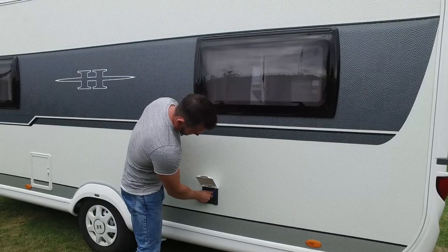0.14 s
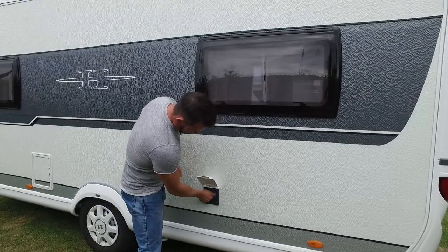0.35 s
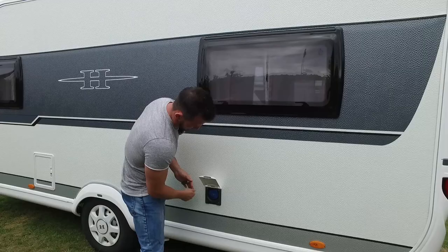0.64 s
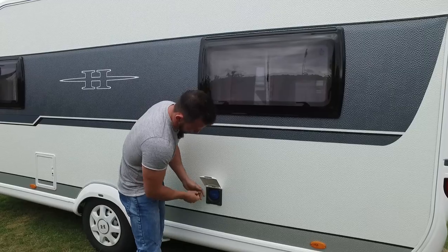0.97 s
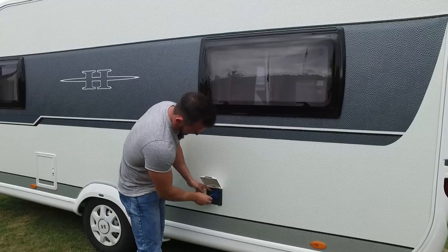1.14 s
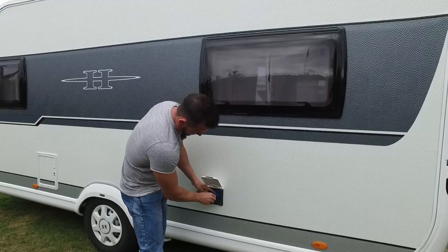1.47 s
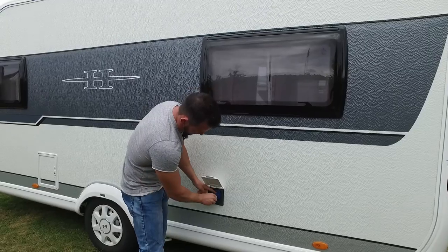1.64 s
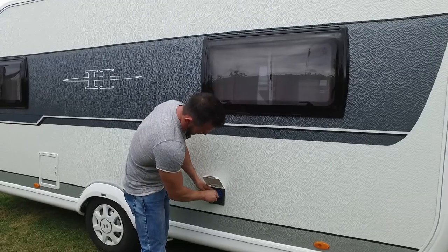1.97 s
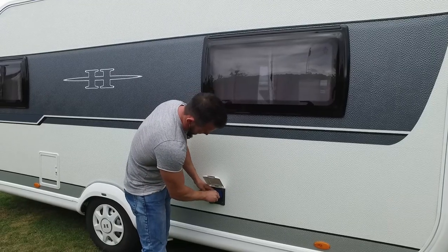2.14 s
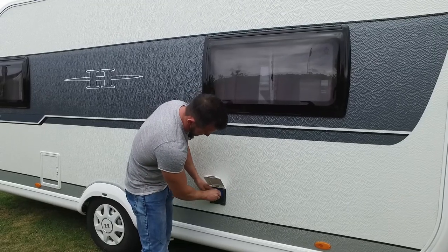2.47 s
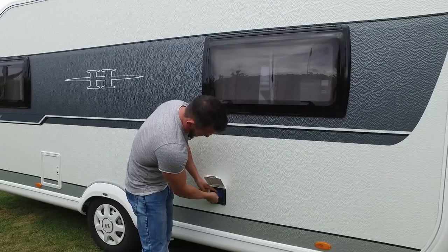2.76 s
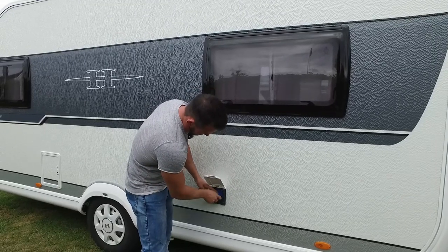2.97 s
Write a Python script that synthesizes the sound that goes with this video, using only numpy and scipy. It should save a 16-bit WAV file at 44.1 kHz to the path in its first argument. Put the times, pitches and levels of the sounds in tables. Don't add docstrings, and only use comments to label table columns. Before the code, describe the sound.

Plastic and key fumbling on a hollow caravan wall, close and outdoors. From 0.05 to 0.4 s, clicks, scrapes and a brief key rattle near 0.25 s, then a strong thudding knock at 0.63 s. Quieter until clacks at 1.4 and 1.6 s. From 2.1 to 2.85 s, cap knocks, scrapes and thuds, strongest around 2.55. Faint wind, distant traffic, a barely audible far hoot at 3 s.

```python
import sys
import numpy as np
from scipy import signal
from scipy.io import wavfile

SR = 44100
rng = np.random.default_rng(int(sys.argv[2]) if len(sys.argv) > 2 else 0)


def transcribe(signal):
    frames = np.atleast_2d(signal).T
    limited = np.clip(frames, -1, 1)
    pcm = np.round(limited * 32767).astype(np.int16)
    wavfile.write(sys.argv[1], SR, pcm)


def rack_gain(trim_db):
    fader = np.asarray(trim_db, float)
    return 10 ** (fader / 20)


N = 136710


def rms_one(x):
    return x / np.sqrt(np.mean(x ** 2) + 1e-20)


def at_hz(points, hz, column=1):
    points = np.array(points)
    return np.interp(np.log(hz), np.log(points[:, 0]), points[:, column])


def drift(rate_hz):
    r = np.exp(-80 * np.pi * rate_hz / SR)
    white = rng.standard_normal(N // 40 + 2002)
    slow = signal.lfilter([1], [1, -2 * r, r * r], white)[2000:]
    return np.interp(np.arange(N) / 40, np.arange(len(slow)), rms_one(slow))


def ring(clicks, hz, t60):
    r, w = rack_gain(-60 / (t60 * SR)), 2 * np.pi * hz / SR
    return signal.lfilter([0, np.sin(w)], [1, -2 * r * np.cos(w), r * r], clicks + 1e-18)


def band_pass(x, low_hz, high_hz):
    return signal.sosfilt(signal.butter(2, [low_hz, high_hz], "band", fs=SR, output="sos"), x)


def bands(low_hz):
    edges = low_hz * 2 ** np.arange(0, 9, .5)
    edges = edges[edges < 20000]
    return [(np.sqrt(a * b), signal.butter(2, [a, b], "band", fs=SR, output="sos"))
            for a, b in zip(edges, edges[1:])]


def coloured(x, spectrum, low_hz):
    return sum(rack_gain(at_hz(spectrum, hz)) * signal.sosfilt(sos, x + 1e-18) for hz, sos in bands(low_hz))


def add(out, s, x):
    i = max(int(s * SR), 0)
    out[i:i + len(x)] += x[:N - i]


def thuds():
    # t/s, peak level/dB, f/Hz
    pushes = [(0.196, -35, 163), (0.211, -29.5, 199), (0.25, -31.5, 197), (0.298, -29, 153),
              (0.315, -32.5, 157), (0.342, -20.5, 265), (0.548, -22, 290), (0.5925, -28, 220),
              (0.6295, -8.5, 326), (1.376, -24.5, 345), (1.4415, -32.5, 232), (1.559, -35, 295),
              (1.6125, -19, 260), (1.872, -33, 248), (2.083, -25, 231), (2.0995, -24, 237),
              (2.119, -28.5, 187), (2.212, -42.5, 247), (2.3351, -19.5, 244), (2.3455, -27, 374),
                  (2.365, -27.5, 293), (2.413, -25, 201), (2.4343, -26, 220), (2.533, -14, 194),
                  (2.559, -25, 240), (2.5843, -15.5, 227), (2.713, -37.5, 280), (2.746, -33.5, 202),
                  (2.77, -30.5, 235), (2.7923, -27, 226), (2.809, -27.5, 290), (2.83, -28.5, 400),
                  (3.06, -39.5, 206)]
    # f/Hz, level/dB, t60/s
    wall_modes = [(141, -70.5, 0.17), (237, -10, 0.28), (277.6, -9, 0.17), (366.2, 2, 0.076),
                  (455.7, -5, 0.084), (541.4, 0.5, 0.089)]
    push_cycles, push_db, panel_db, lag_s = 0.41, 1, -16.5, .004
    rows = pushes
    t = np.arange(SR // 4) / SR
    kick = np.arange(SR // 4) == 0
    luck_db = rng.normal(0, 2.12, (len(rows), len(wall_modes)))
    out = np.zeros(N)
    for (s, db, hz), lucks in zip(rows, luck_db):
        u = t * hz / push_cycles
        push = -u * np.exp(1 - u) * np.sin(2 * np.pi * hz * t)
        panel = sum(rack_gain(mode_db + luck) * ring(kick, f, t60)
                    for (f, mode_db, t60), luck in zip(wall_modes, lucks))
        panel = panel * (1 - np.exp(-u * .5))
        add(out, s + lag_s, rack_gain(db + push_db) * (push - rack_gain(panel_db) * panel))
    return out


def bursts(lengths, spectrum, low_hz, rough):
    t = np.arange(rough.shape[1]) / SR
    shape = np.exp(-t / np.reshape(lengths, (-1, 1))) * (1 - np.exp(-t / .0003))
    x = coloured(rough * shape, spectrum, low_hz)
    return x / np.abs(x).max(axis=1, keepdims=True)


def contacts():
    # t/s, peak level/dB, treble level over it/dB
    part_clicks = [(0.062, -32.5, -21), (0.0833, -28, -22), (0.0942, -22.5, -14.5), (0.213, -20, -38),
                   (0.2552, -11, -16.5), (0.3028, -11, -14), (0.325, -28, -25), (0.3456, -13.5, -37),
                   (0.551, -33.5, -10), (0.612, -34.5, -14), (0.6337, -10, -37), (1.3787, -19, -12.5),
                   (1.463, -39, -3.5), (1.544, -53, -11), (1.5628, -47, -3), (1.6188, -25.5, -38),
                   (1.873, -48.5, -4.5),
                   (2.0975, -33, -36), (2.1007, -42, -36), (2.12, -50, -26), (2.2168, -37.5, -21),
                  (2.3395, -16.5, -48), (2.349, -25, -30), (2.413, -32, -2.5), (2.4165, -32.5, -5.5),
                  (2.4364, -37, -7), (2.4435, -32, -38), (2.5411, -18.5, -2.5), (2.5703, -39, -6),
                  (2.588, -20, -39), (2.7472, -47, -2), (2.7714, -44, -26), (2.816, -37, -39),
                  (3.0609, -34, -13), (2.5937, -11, -57)]
    # t/s, peak level/dB
    ticks = [(0.7577, -48.5), (1.736, -39), (2.0173, -42), (2.2059, -46), (2.3334, -50), (2.8584, -33),
             (2.851, -45)]
    # f/Hz, level per Hz/dB
    body_colour = [(1400, 15.5), (2300, 7), (3800, 12.5), (5600, -8), (7000, -14.5), (12000, -73)]
    treble_colour = [(4000, -33), (7000, -4), (11000, 32), (16000, -24)]
    click_s, longer_per_db, tick_s = .002, .15, .0005
    click_db, tick_treble_db = -13, -1
    clicks = part_clicks
    rows = clicks + [(s, db - tick_treble_db, tick_treble_db) for s, db in ticks]
    lengths = [click_s * rack_gain(longer_per_db * (db + 30)) for s, db, _ in clicks] + [tick_s] * len(ticks)
    rough = rng.standard_normal((60, SR // 30))[:len(rows)]
    body = bursts(lengths, body_colour, 1400, rough)
    treble = bursts(lengths, treble_colour, 2800, rough)
    out = np.zeros(N)
    for (s, db, treble_db), low, high in zip(rows, body, treble):
        add(out, s, rack_gain(db + click_db) * (low + rack_gain(treble_db) * high))
    return out


def knocks():
    # t/s, peak level/dB, strongest f/Hz
    cap_knocks = [(0.083, -49, 1390), (0.093, -40, 1520), (0.204, -26, 1090), (0.343, -30.5, 1510),
                  (0.552, -30, 795), (0.616, -40.5, 760), (0.635, -15.5, 1178), (0.826, -51, 1074),
                  (1.38, -28, 1370), (1.453, -40.5, 1420), (1.463, -39, 1280), (1.54, -45, 1370),
                  (1.562, -42, 1380), (1.6185, -35, 780), (1.875, -44, 1290), (2.101, -30.5, 1176),
                  (2.121, -33, 1124), (2.218, -51.5, 1090), (2.322, -47.5, 1090), (2.341, -23, 796),
                  (2.366, -33.5, 1090), (2.418, -30, 1140), (2.443, -36, 1300), (2.541, -28.5, 930),
                  (2.5935, -27, 1440), (2.77, -38.5, 1380), (2.795, -31, 1090), (2.815, -27, 1326),
                  (3.064, -45, 1040), (1.379, -49, 2560)]
    # f/Hz, level/dB, t60/s
    cap_modes = [(755, 0, 0.0077), (1090, 10, 0.019), (1380, 4.5, 0.013), (1490, -23.5, 0.0082),
                 (2227, 1, 0.0079)]
    contact_s, main_t60_s, side_modes_db, knock_db = 0.0013, 0.033, -10.5, 1
    t = np.arange(SR // 10) / SR
    rough = rng.standard_normal((40, len(t)))
    luck_db = rng.normal(0, 4, (40, len(cap_modes)))
    soften = signal.butter(2, 3200, fs=SR, output="sos")
    out = np.zeros(N)
    for (s, db, hz), noise, lucks in zip(cap_knocks, rough, luck_db):
        burst = signal.sosfilt(soften, noise * t * np.exp(-t / contact_s))
        side_modes = sum(rack_gain(side_modes_db + mode_db + luck) * ring(burst, f, t60)
                         for (f, mode_db, t60), luck in zip(cap_modes, lucks))
        knock = ring(burst, hz, main_t60_s) + side_modes
        add(out, s, rack_gain(db + knock_db) * knock / np.abs(knock).max())
    return out


def rings():
    # t/s, peak level/dB, f/Hz, t60/s
    free_modes = [(0.204, -35, 1030, 0.012), (0.347, -30.5, 600, 0.085), (0.36, -42, 600, 0.066),
                  (0.553, -50, 1820, 0.077), (0.636, -34, 1890, 0.02), (1.379, -39.5, 935, 0.04),
                  (1.3808, -27, 2350, 0.0058), (1.619, -39, 1380, 0.026), (1.618, -33.5, 2520, 0.0049),
                  (1.618, -31.5, 3430, .005), (2.099, -35.5, 3570, 0.0033), (2.102, -41, 2140, 0.025),
                  (2.131, -62, 2120, 0.066), (2.541, -26.5, 1466, 0.026), (2.572, -40.5, 1374, 0.032),
                  (2.593, -18, 1380, 0.024), (2.595, -25, 4960, 0.0081), (2.6, -42.5, 2100, 0.09),
                  (2.74, -58, 1180, 0.023), (2.779, -40, 1500, .02), (2.779, -53, 3130, 0.01),
                  (2.785, -45, 226, .04), (2.795, -63, 1840, 0.0055), (2.814, -70, 3660, 0.012),
                  (2.82, -32, 493, 0.075), (2.836, -44, 1430, 0.021), (2.11, -28.5, 232, 0.05),
                  (1.454, -34.5, 297, 0.056), (1.5653, -30.5, 366, 0.049), (2.443, -31.5, 225, 0.037),
                  (0.6317, -24, 780, 0.0099), (2.822, -57, 7300, 0.033), (2.343, -40, 3680, 0.026)]
    rise_cycles = 0.5
    out, t = np.zeros(N), np.arange(SR // 5) / SR
    for s, db, hz, t60 in free_modes:
        shape = (1 - np.exp(-t * hz / rise_cycles)) * rack_gain(-60 * t / t60)
        add(out, s, rack_gain(db) * shape / shape.max() * np.sin(2 * np.pi * hz * t))
    return out


def key():
    # f/Hz, level/dB, t60/s
    key_modes = [(1538, -9, 0.3), (2805, -14, 0.19), (2960, -11, 0.16), (3300, -11, 5.0), (3867, -7, 0.11),
                 (4660, -5, 0.31), (5300, -15, 0.075), (5740, -6.5, 0.078), (11870, -17, 0.12)]
    struck_s, damped_s, key_db, rattles_per_s = .2555, .031, -47, 6000
    t = np.arange(SR // 10) / SR
    rattles = rng.random(len(t)) < rattles_per_s / SR
    tone = 0
    for hz, db, t60 in key_modes:
        blows = (t == 0) + 0.4 * rattles * rng.standard_normal(len(t))
        tone = tone + rack_gain(db) * ring(blows, hz, min(t60, .06))
    out = np.zeros(N)
    add(out, struck_s, rack_gain(key_db) * tone * np.exp(-(t / damped_s) ** 6))
    return out


def scrapes():
    # start t/s, length/s
    strokes = [(.052, .07), (.193, .027), (.21, .05), (.298, .042), (.376, .036), (2.096, .045),
               (2.337, .042), (2.537, .044), (2.587, .06), (2.712, .15), (.248, .014), (.339, .014),
               (2.808, .022), (1.384, .035), (.64, .04)]
    # level/dB, slope/dB per octave, strongest f/Hz
    stroke_colours = [(-60.5, -6.5, 1350), (-45, -1.5, 4100), (-60.5, -1, 5500), (-46, 1.5, 6000),
                      (-63.5, -3, 8100), (-50, -5, 970), (-46.5, -4, 1240), (-43, -4, 1050),
                      (-55, -1.5, 5400), (-61, -8, 1440), (-47, -8.5, 2500), (-42.5, -5.5, 4000),
                      (-53, -7.5, 4800), (-60, -8.5, 4200), (-55.5, -9.5, 2800)]
    grains_per_s, grain_spread_db, grain_cycles = 9000, 2, 16
    peak_db, peak_octaves, fade_db = 12, 0.25, -9
    sizes = rack_gain(grain_spread_db * np.minimum(rng.exponential(1, N), 4.0)) * rng.choice([-1, 1], N)
    grains = sizes * (rng.random(N) < grains_per_s / SR) * rack_gain(1.5 * drift(150))
    pitches = np.geomspace(800, 14000, 24)
    dealt = rng.integers(0, 24, N)
    resonances = np.array([ring(ring(grains * (dealt == k), hz, grain_cycles / hz), hz, 3 / hz)
                           for k, hz in enumerate(pitches)])
    resonances /= resonances.std(axis=1, keepdims=True)
    octaves = np.log2(pitches / 800)[:, None]
    out, luck_db = np.zeros(N), rng.normal(0, 2, (20, 24))
    for (s, length), (db, slope_db, peak_hz), luck in zip(strokes, stroke_colours, luck_db):
        bump = luck + peak_db * np.exp(-(np.log2(pitches / peak_hz) / peak_octaves) ** 2)
        i, n = int(s * SR), int(length * SR)
        fade = fade_db * (1 + octaves / 2) * np.linspace(0, 1, n)
        levels = rack_gain((slope_db + 3) * octaves + bump[:, None] + fade)
        part = rms_one((levels * resonances[:, i:i + n]).sum(axis=0))
        add(out, s, rack_gain(db) * part * signal.windows.tukey(n, .25))
    return out


def swells(rows):
    t = np.arange(N) / SR
    return sum(height * np.exp(-((t - s) / half) ** 4) for s, half, height in rows)


def rubs():
    # middle t/s, half length/s, level/dB
    slides = [
        (0.064, 0.076, -59),
        (0.294, 0.095, -51),
        (1.78, 0.13, -67),
        (3.008, 0.081, -61),
    ]
    dull = band_pass(rng.standard_normal(N), 143, 600)
    lumps = rack_gain(2.64 * drift(rate_hz=21))
    return rms_one(dull) * lumps * swells([(s, half, rack_gain(db)) for s, half, db in slides])


def tail(hits):
    # f/Hz, level/dB, t60/s
    body = [(97.6, -32, 0.6), (280, -10, 0.081), (737, -13.5, 0.13), (1640, -22.5, 0.15),
            (4680, -53.5, 0.2), (11300, -10, 0.069)]
    out, white = 0, rng.standard_normal((2, N))
    for k, (hz, sos) in enumerate(bands(71.2)):
        r = rack_gain(-120 / (at_hz(body, hz, column=2) * SR))
        power = signal.lfilter([300 / SR], [1, -r], signal.sosfilt(sos, hits + 1e-12) ** 2)
        out = out + rack_gain(at_hz(body, hz)) * np.sqrt(power) * rms_one(signal.sosfilt(sos, white[k % 2]))
    return out


def rumble():
    # middle t/s, half length/s, level over the wind/dB
    shakes = [
        (0.311, 0.13, 20.5),
        (2.611, 0.087, 15),
        (2.874, 0.044, 8.5),
    ]
    wind_db = -56.5
    low = band_pass(rng.standard_normal(N), 28, 80)
    return rack_gain(wind_db + swells(shakes)) * rms_one(low)


def air():
    # f/Hz, level/dB
    outdoors = [(53, -31), (90, -5), (232, -17), (398, -23.5), (424, -16), (682, -22.5), (15500, -54)]
    air_db = -62.5
    white = rng.standard_normal((2, N))
    far = sum(rack_gain(at_hz(outdoors, hz) + drift(rate_hz=1.7)) * signal.sosfilt(sos, white[k % 2])
              for k, (hz, sos) in enumerate(bands(87.6)))
    return rack_gain(air_db) * rms_one(far)


def hoot():
    start_s, rise_s, length_s, die_s = 2.97, 0.013, .12, 0.046
    pitch_hz, waver_hz, waver_db, hoot_db = 740, 3, 1.5, -62
    t = np.arange(N) / SR
    tone = np.sin(2 * np.pi * np.cumsum(pitch_hz + waver_hz * drift(rate_hz=35)) / SR)
    rise = np.clip((t - start_s) / rise_s, 0, 1)
    fall = np.exp(-(np.maximum(t - start_s - length_s, 0) / die_s) ** 2)
    return rack_gain(hoot_db) * rise * fall * tone * rack_gain(waver_db * drift(rate_hz=36))


def scene():
    hits = thuds() + contacts() + knocks() + rings() + key()
    outdoors = rumble() + air() + hoot()
    return (hits + tail(hits) + scrapes() + rubs() + outdoors)[None, :]


def top_cut(x):
    return signal.sosfilt(signal.butter(12, 15790, fs=SR, output="sos"), x)


def record(dry):
    cut = signal.sosfilt(signal.cheby2(12, 70, 16100, fs=SR, output="sos"), dry)
    return top_cut(cut)


dry = scene()
out = record(dry)
transcribe(out)
```